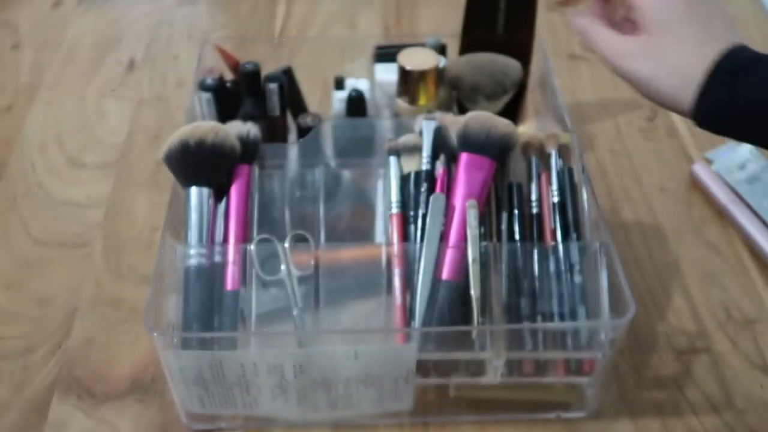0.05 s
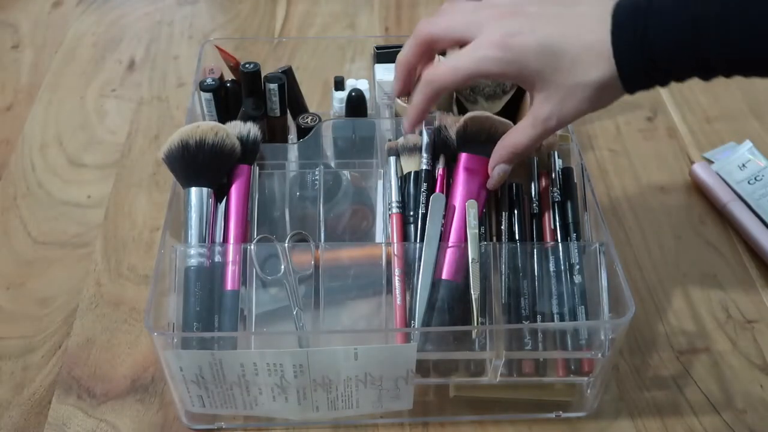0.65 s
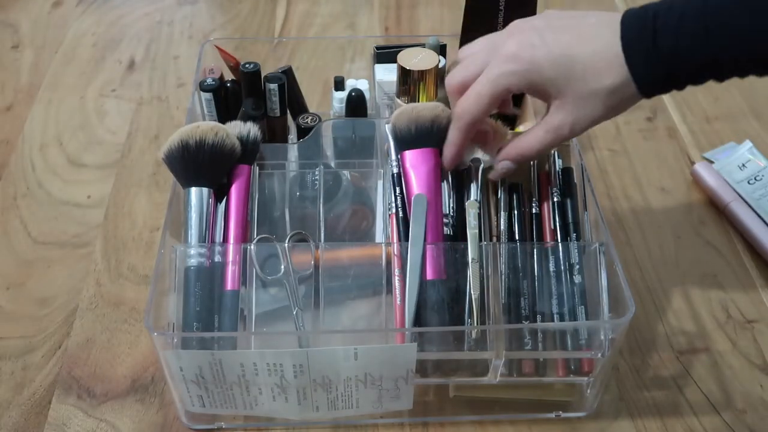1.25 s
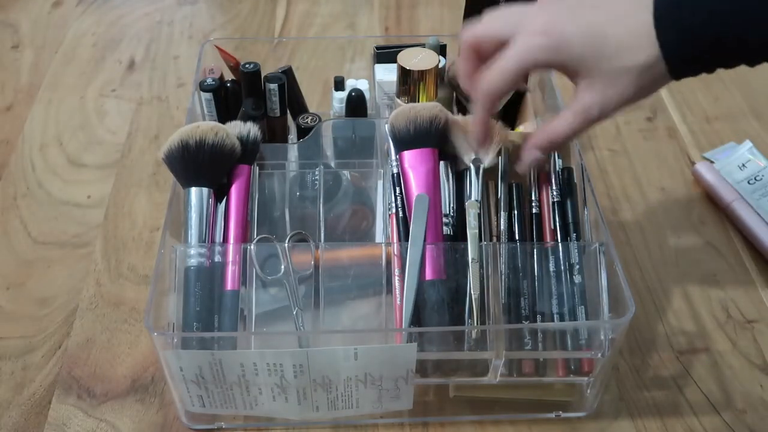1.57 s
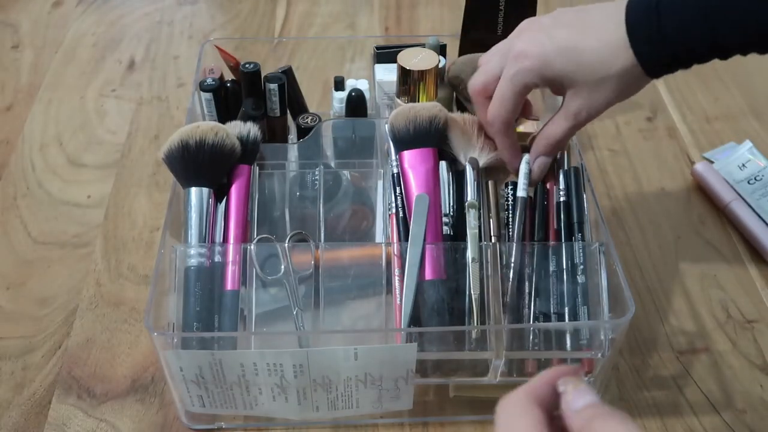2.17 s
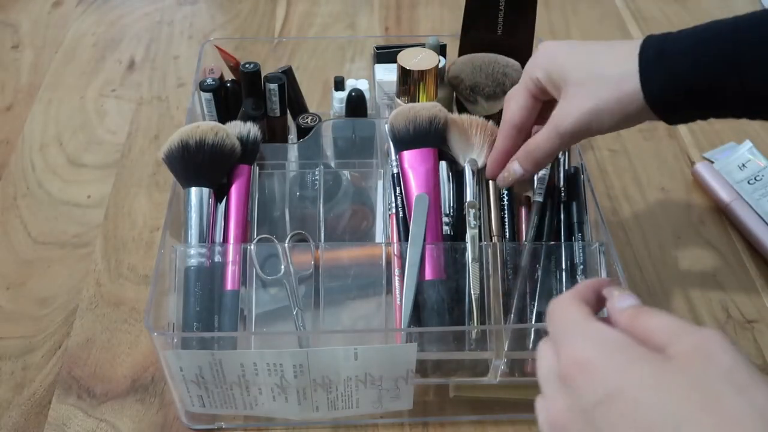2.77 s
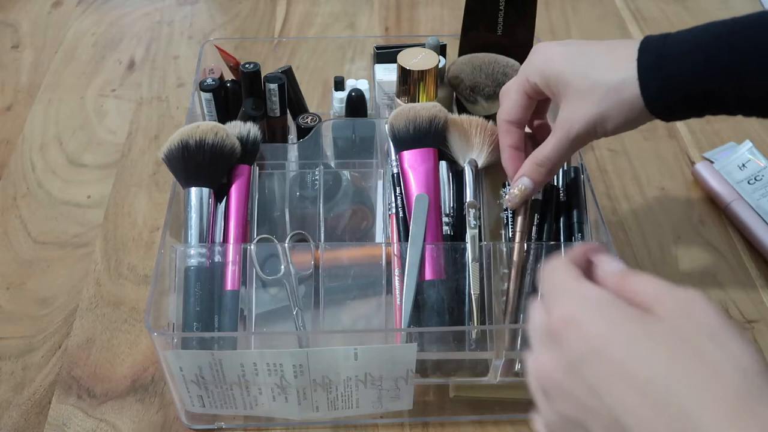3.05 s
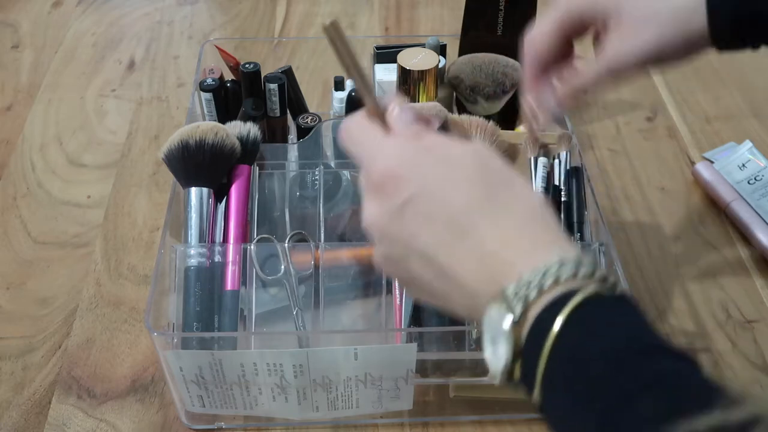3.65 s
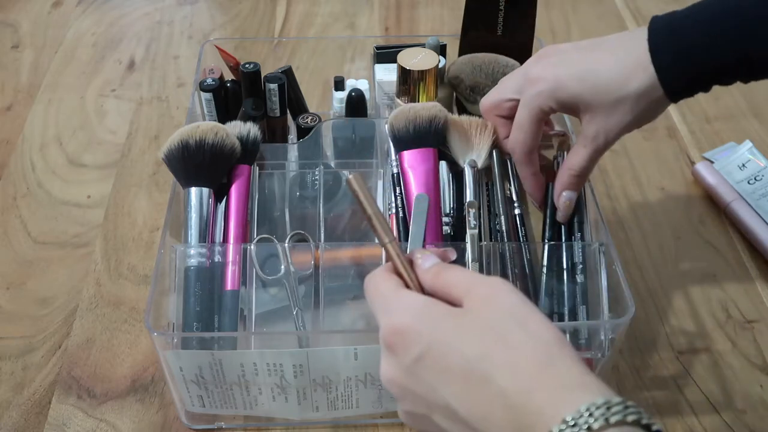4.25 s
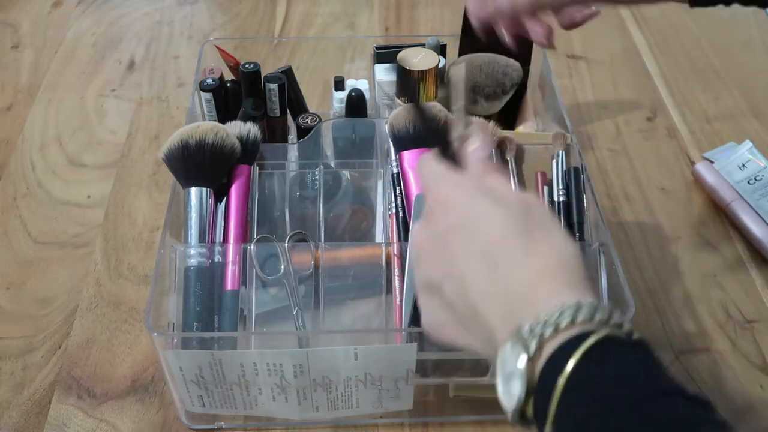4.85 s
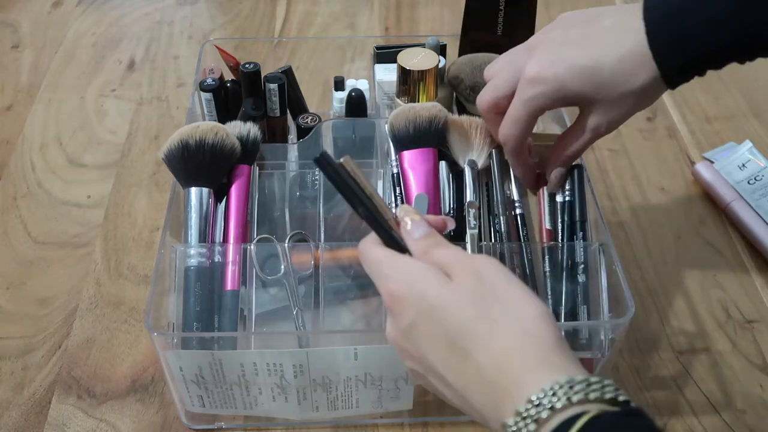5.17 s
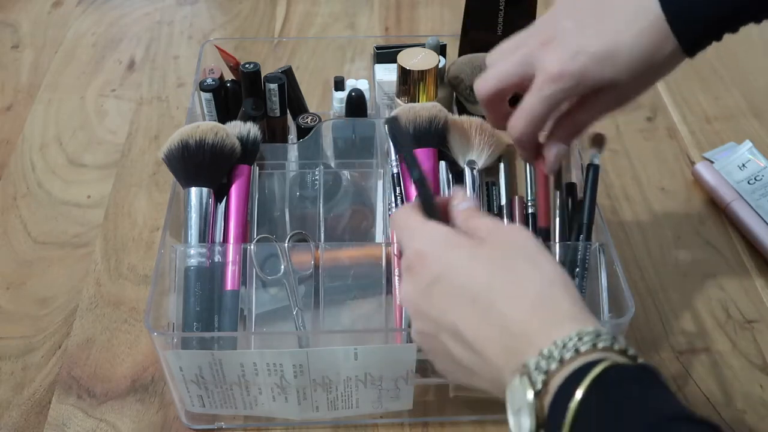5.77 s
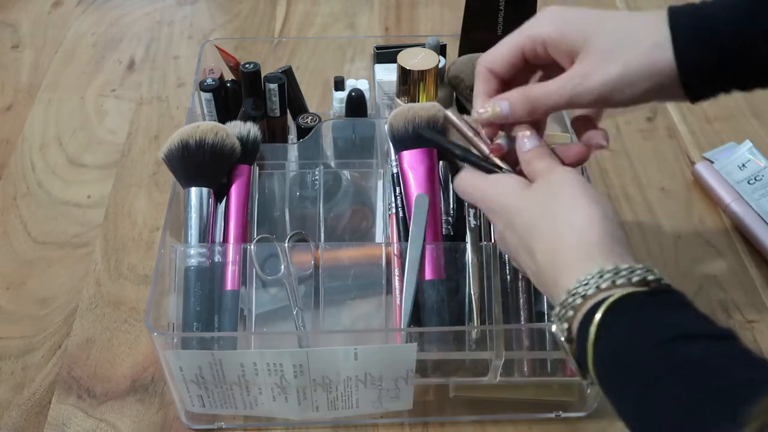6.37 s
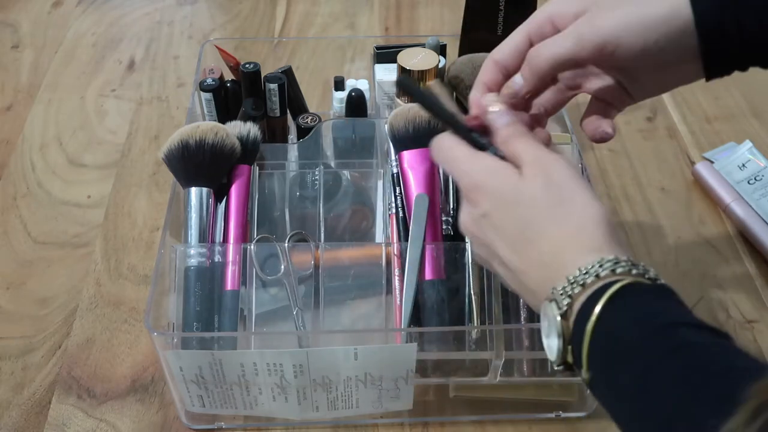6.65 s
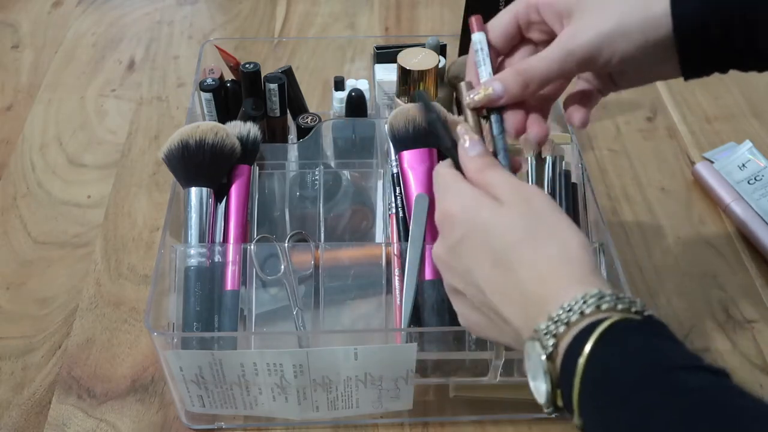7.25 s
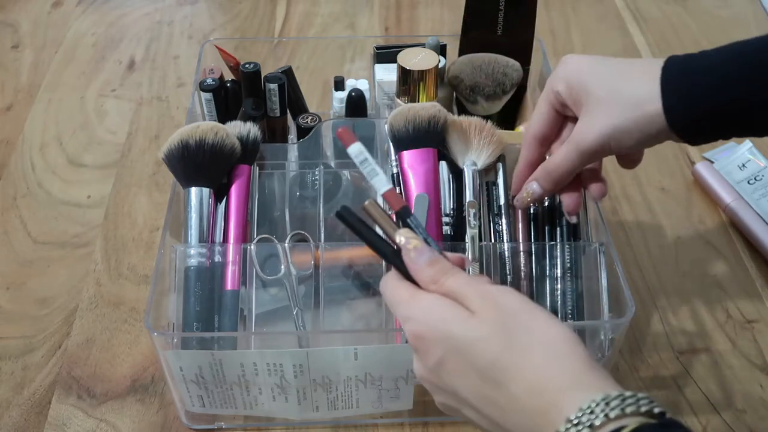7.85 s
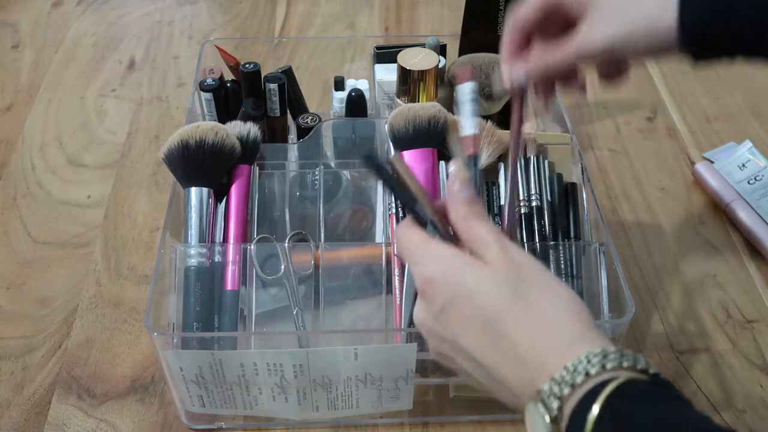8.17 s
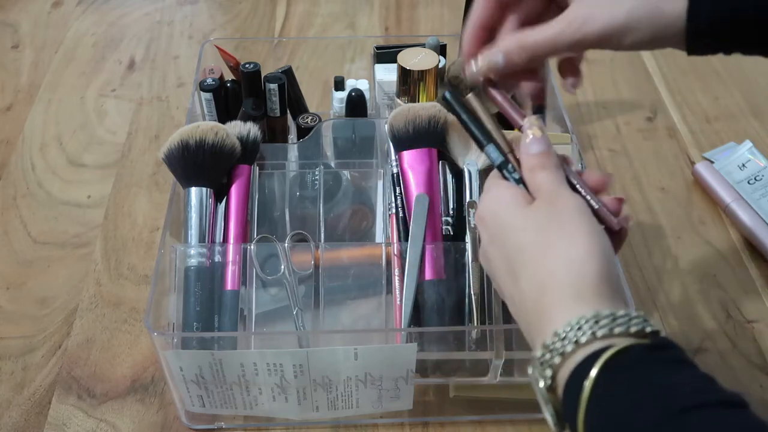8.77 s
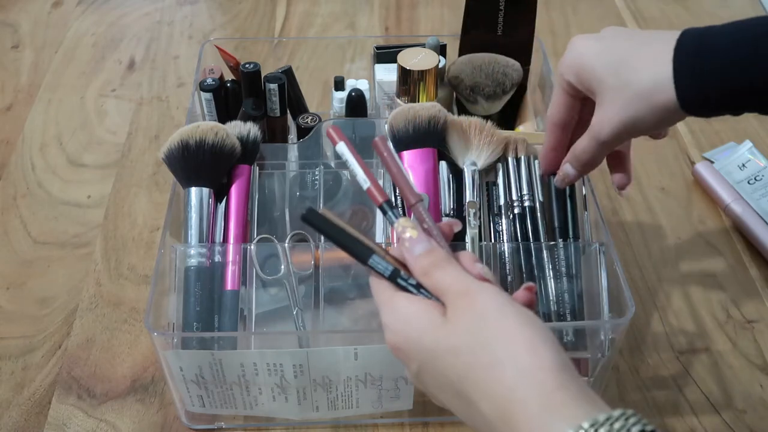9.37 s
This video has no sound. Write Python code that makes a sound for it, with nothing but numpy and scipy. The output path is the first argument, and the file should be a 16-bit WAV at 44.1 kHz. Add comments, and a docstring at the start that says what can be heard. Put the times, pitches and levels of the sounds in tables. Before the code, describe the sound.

Pencils and slim brushes are picked out of a plastic organizer on a wooden table, heard close up in a bare room with a short echo and faint steady hum and hiss. A light scrape at 0.2 seconds leads to a cluster of hard clacks around 1 second, with a soft jolt of the table. From 2 seconds the rummaging thickens: pencils drop onto the hollow tray floor, tap and scrape, each knock at a slightly different pitch. Louder clacks with brief rattles along the walls come near 3.4 and 4.5 seconds, and the busiest clatter runs from about 5.2 to 6 seconds. After that it thins to small bright clicks of pencils meeting in the hand, with a scrape and knocks near 6.8 and more knocks around 7.7 and 8.2. A tap and a soft thud finish it at about 9.3 seconds.

```python
"""Pencils and slim brushes are picked out of a clear plastic organizer on a wooden table, in a bare room.
Over faint hum and hiss, a light scrape leads to hard clacks against the walls and a jolt of the table.
Then the rummaging thickens: pencils drop onto the hollow tray floor, scrape, knock with their own
pitches and rattle along a wall on the way out. After six seconds it thins to bright clicks in the hand
and scattered knocks, ending on a tap and a thud. Two close microphones hear each contact, then the room."""
import sys
import numpy as np
from scipy import signal
from scipy.fft import rfft, irfft, next_fast_len
from scipy.io import wavfile

SR = 44100
rng = np.random.default_rng(int(sys.argv[2]) if len(sys.argv) > 2 else 0)


def digitize_waveform(pressure):
    """Quantize a signal to 16-bit integers and store it at the path in sys.argv[1].

    Rows of a 2-D input are taken as channels; values are limited to [-1, 1].
    """
    field = np.atleast_2d(pressure).T
    bounded = np.clip(field, -1, 1)
    quanta = np.round(bounded * 32767).astype(np.int16)
    wavfile.write(sys.argv[1], SR, quanta)


N = 414981
BLOW_S = .01  # a blow's level is its energy taken as an rms over this time
BLOW_T = np.arange(round(.1 * SR)) / SR  # time axis of one blow, in s

# modes of the tray floor and of its walls: f/Hz, level/dB, t60/s
FLOOR_MODES = [(330, -1, 0.034), (381, 0.5, 0.059), (400, -1.5, 0.13), (440, -2.5, 0.061), (490, -2, 0.045),
               (556, 0, 0.03), (614, -1, 0.035), (660, 1, 0.025), (749, -3.5, 0.048)]
WALL_MODES = [(850, 3.5, 0.023), (877, 0, 0.049), (966, -4, 0.05), (1094, -10, 0.11), (1198, 1, 0.032),
              (1260, -8, 0.014), (1530, -2, 0.013)]
# hard strikes: t/s, then f/Hz and level/dB for each of floor, wall, shaft, clink and tip, then tick/dB
HITS = [(0.855, 517, -37, 910, -41, 1430, -46.0, 3440, -39.0, 5500, -40, -50),
        (0.944, 437, -26, 715, -34.5, 1520.0, -33.5, 3220, -28, 6400, -32, -60),
        (0.969, 406, -28, 706, -26, 1590.0, -40, 2930, -33, 5630.0, -52, -48),
        (0.994, 400, -24, 1450.0, -26, 1660, -19, 3290.0, -20, 5240, -25.0, -30.5),
        (1.076, 623, -25.5, 710, -28, 1770.0, -33.0, 3400, -34, 5010.0, -34, -34.0),
        (1.322, 360.0, -30.5, 710, -34.5, 1660, -39, 3670.0, -48, 4370, -51.5, -68),
        (1.724, 400.0, -36.5, 800, -34.5, 2310, -43, 3140, -34.5, 4280, -31.5, -54),
        (1.743, 362, -32, 715, -26.5, 1640, -33.5, 2600.0, -34, 4300, -36.5, -46),
        (2.382, 390.0, -32, 1140, -41.5, 2100, -34.5, 3400, -30, 4320, -33.0, -40),
        (3.099, 437, -25.5, 1290, -25, 2480, -20.5, 3970.0, -28, 5000, -29, -55),
        (3.336, 495, -24.5, 1140, -21, 1880, -22, 2550, -28, 4260, -28.5, -44),
        (3.362, 440.0, -26.5, 926, -23, 2300, -25.5, 3030.0, -35, 4350, -33, -53),
        (3.893, 450.0, -32.5, 1280, -37.0, 2270.0, -40, 3180, -32.5, 4280, -30.5, -50),
        (4.431, 394, -34, 1010, -36, 1560, -29.5, 2700, -29.0, 4300, -28.5, -36),
        (4.477, 500.0, -23.5, 966, -18, 2160, -21.5, 2630, -26.5, 5120.0, -26, -33),
        (4.512, 465, -32.5, 965, -20, 2150, -26.5, 3280.0, -33, 4500, -36, -44),
        (5.866, 434, -22, 1140, -29.0, 1850.0, -26.5, 4340, -20.5, 6200, -26, -22.5),
        (5.935, 400.0, -28.5, 1040, -28, 2350.0, -28, 3070, -31.5, 4300, -36.5, -57),
        (6.021, 390.0, -39, 915, -30.5, 2430, -25, 2590, -24, 6600, -33, -58),
        (6.032, 383, -43, 890.0, -33.5, 1720, -28, 2800, -29, 6630.0, -54, -57.5),
        (6.044, 427, -37, 1250, -29.5, 2320, -40, 2770, -33, 4250, -33, -54),
        (6.706, 384, -36.5, 1260, -42, 1450.0, -38.5, 3890.0, -36, 6200, -35, -36.5),
        (6.757, 376, -39, 1040, -43, 1710, -43, 2830, -38.5, 4590.0, -43, -52.0),
        (6.801, 400.0, -29.5, 1450.0, -45, 2520.0, -45, 2820.0, -33, 6930.0, -44, -50),
        (6.853, 400.0, -38, 1060, -39, 1970, -44, 3500, -46.5, 4850.0, -42.5, -52),
        (7.135, 385, -64, 1380.0, -54.5, 2680.0, -41.5, 3570.0, -39.5, 5640, -41.5, -41),
        (8.181, 430, -33.5, 1390, -39.5, 2110, -37.5, 3460, -31.5, 6150, -35, -38),
        (8.261, 440, -30.5, 850.0, -28, 2210, -25.0, 3730, -26.5, 4400.0, -25.5, -58)]


def from_db(db):
    """Decibels to gain."""
    return 10 ** (np.asarray(db) / 20)


def at_hz(points, hz):
    """Read a curve on a log-frequency axis."""
    points = np.array(points)
    return np.interp(np.log(np.maximum(hz, 1)), np.log(points[:, 0]), points[:, 1])


def columns(rows):
    """A table's columns, each with one row a blow."""
    return np.transpose(rows)[..., None]


def unit_blow(x):
    """Scale each row to the energy of BLOW_S seconds at rms 1."""
    return x * np.sqrt(BLOW_S * SR / (np.sum(x ** 2, axis=-1, keepdims=True) + 1e-20))


def band(x, low_hz, high_hz, order=2):
    """Causal band-pass."""
    sos = signal.butter(order, [low_hz, high_hz], "band", fs=SR, output="sos")
    return signal.sosfilt(sos, x + 1e-18)


def add(track, s, sound):
    """Mix a sound into the track from time s."""
    start = round(s * SR)
    track[start:start + len(sound)] += sound[:max(N - start, 0)]


def stereo_noise(size, likeness):
    """Frequencies, spectra of two white noises with a given likeness, and the share they have in common."""
    mid, side = rfft(rng.standard_normal((2, size)))
    hz = np.fft.rfftfreq(size, 1 / SR)
    common = (1 + at_hz(likeness, hz)) / 2
    return hz, np.sqrt(common) * mid + np.sqrt(1 - common) * side * [[1], [-1]], common


def background(hiss_db=-55.5):
    """Room tone: rumble that both microphones share, their own hiss, and hum."""
    # colour of rumble and hiss: f/Hz, relative density/dB
    colour = [(15, -36.5), (25, -8), (108, -3), (170, -4), (354, -3.5), (476, -9.5), (775, -12),
              (1130, -14), (1370, -15), (2610, -18), (3250, -20.5), (3920, -21.5), (4740, -24.5),
              (12900, -33), (16000, -72)]
    # their stereo image: f/Hz, left-right likeness
    likeness = [(60, 1), (130, 0.77), (290, 0.21), (640, -0.12), (1410, -0.089), (6800, -0.22),
                (15000, 0.96)]
    # mains hum and a thin whine: f/Hz, level/dB
    tones = [(49, -69), (102, -68), (13050, -74.5)]
    size = 2 * next_fast_len(N // 2 + 1)
    hz, noise, common = stereo_noise(size, likeness)
    hiss = irfft(noise * from_db(at_hz(colour, hz)) / np.sqrt(common), size)[:, :N]
    t = np.arange(N) / SR
    hum = sum(from_db(db) * np.sqrt(2) * np.sin(2 * np.pi * (f * t + rng.random())) for f, db in tones)
    return from_db(hiss_db) * hiss / np.std(hiss.mean(axis=0)) + hum


def room(send, predelay_s=.00607, build_s=.00076, early_db=-2, early_t60=.12):
    """Strong early reflections off table and body, then a diffuse tail that dies sooner in the treble."""
    # reverb time: f/Hz, t60/s
    decay_times = [(100, 0.66), (300, 0.57), (900, 0.55), (2000, 0.58), (5000, 0.53), (13000, 0.32)]
    # reverb against its send: f/Hz, level/dB
    colour = [(100, 1.5), (400, -3.5), (1000, 1.5), (2500, -1.56), (6000, -0.86), (13000, -3)]
    # stereo image of the reverb: f/Hz, left-right likeness
    likeness = [(250, 1), (700, 1), (1400, 1), (3100, 0.99), (6800, 0.55), (15000, 1)]
    hz, noise, _ = stereo_noise(SR, likeness)
    since = np.maximum(np.arange(SR) / SR - predelay_s, 0)
    early = from_db(early_db - 60 * since / early_t60)
    tail = 0
    for centre, t60 in decay_times:
        share = at_hz([(f, f == centre) for f, _ in decay_times], hz)
        wash = irfft(noise * share * from_db(at_hz(colour, hz)), SR)
        decay = np.minimum(since / build_s, 1) * (from_db(-60 * since / t60) + early)
        tail = tail + wash * decay / np.sqrt(np.sum(decay ** 2))
    return signal.fftconvolve(send[None], tail, axes=1)[:, :N]


def place_in_tray(tracks, s, direct, send, pan_spread_db=.2, lag_spread_s=.000012):
    """A contact at a random spot shifts slightly in level and arrival. Tracks: left, right, room send."""
    spot = rng.standard_normal()
    pan = from_db(-pan_spread_db * spot / 2)
    add(tracks[0], s, direct * pan)
    add(tracks[1], s + lag_spread_s * spot, direct / pan)
    add(tracks[2], s, send)


def ring(modes, count=1, pitch=1, favoured_hz=None, focus_db_per_octave=22, spread_db=3, detune=.017):
    """Damped modes, one row a blow; the point of contact gives each a new strength and sign."""
    chance = rng.standard_normal((count, len(modes), 3)).transpose(1, 2, 0)[..., None]
    out = 0
    for (hz, db, t60), (strength, sign, shift) in zip(modes, chance):
        if favoured_hz is not None:
            db = db - focus_db_per_octave * np.abs(np.log2(hz / favoured_hz))
        phase = 2 * np.pi * hz * pitch * (1 + detune * shift) * BLOW_T
        envelope = from_db(db + spread_db * strength - 60 * BLOW_T / t60)
        out = out + np.sign(sign) * envelope * np.sin(phase)
    return unit_blow(out)


def crack(low_hz, high_hz, t60, count=1, rise_s=.00019):
    """The attack: many heavily damped modes speak in the first milliseconds, one row a blow."""
    envelope = from_db(-60 * BLOW_T / t60) * (1 - np.exp(-BLOW_T / rise_s))
    burst = rng.standard_normal((count, len(BLOW_T))) * envelope
    return unit_blow(band(burst, low_hz, high_hz, order=3))


def band_click(low_hz, high_hz, order):
    """A heavily damped resonance answers an impulse."""
    return unit_blow(band(1. * (BLOW_T == 0), low_hz, high_hz, order))


def thuds(count):
    """The table top, shaken through the organizer's feet, one row a blow."""
    # modes of the wooden top: f/Hz, level/dB, t60/s
    table_modes = [(67, 4.5, 0.064), (106.3, -4.5, 0.2), (157.2, -1.5, 0.18), (244, 7, 0.1)]
    return unit_blow(band(ring(table_modes, count), 68, 375))


def jolts():
    """The hand shoves the whole organizer against the table top."""
    # shoves: t/s, level/dB
    shoves = [(1.073, -36.5), (1.323, -43), (1.725, -39), (1.746, -39), (5.531, -36), (5.58, -44),
              (6.377, -41), (7.696, -39.5), (9.307, -37)]
    out = np.zeros(N)
    for (s, db), thud in zip(shoves, thuds(len(shoves))):
        add(out, s, from_db(db) * thud)
    return out


def slides(slips_per_s=220, uneven_db=5):
    """A sliding pencil catches and slips; every slip is a tiny new blow on tray and shaft."""
    # scrapes along the walls: t/s, length/s, tray/dB, shaft/dB
    scrapes = [(0.229, 0.058, -53, -67), (0.998, 0.072, -33, -46), (2.053, 0.089, -41, -48),
               (2.66, 0.38, -58.5, -62), (3.06, 0.05, -47, -54), (3.824, 0.066, -48, -46),
               (3.892, 0.075, -40, -43.5), (4.351, 0.058, -45, -42), (5.199, 0.046, -39.5, -47),
               (5.514, 0.12, -38.5, -46), (5.745, 0.16, -33.5, -51), (5.875, 0.075, -33, -36.5),
               (6.02, 0.037, -46, -39.5), (6.711, .17, -41.5, -48), (9.299, 0.096, -48.5, -70)]
    out = np.zeros(N)
    for s, length, tray_db, shaft_db in scrapes:
        count = max(round(slips_per_s * length), 3)
        tray = band(ring(FLOOR_MODES, count) + from_db(-12) * ring(WALL_MODES, count), 283, 1900)
        shaft = crack(1100, 3330, .019, count) + from_db(-8) * crack(3800, 9400, .0023, count)
        slips = from_db(tray_db) * tray + from_db(shaft_db) * shaft
        # the slips share the slide's power unevenly
        sizes = from_db(uneven_db * rng.standard_normal(count))
        sizes /= np.sqrt(np.mean(sizes ** 2) * BLOW_S * slips_per_s)
        times = s + length * (np.arange(count) + rng.random(count)) / count
        for start, size, slip in zip(times, sizes, slips):
            add(out, start, size * slip)
    return out


def part(ringing, low_hz, high_hz, crack_t60, ring_db):
    """One radiating part: its ring and its crack, within the band where it radiates well."""
    both = from_db(ring_db) * ringing + crack(low_hz, high_hz, crack_t60, count=len(ringing))
    return unit_blow(band(both, .64 * low_hz, 1.45 * high_hz))


def parts(hardness, knock_hz=495, shaft_hz=2400, clink_hz=3970):
    """Table top, floor, wall, shaft, clink and tick; a soft contact dwells longer and smears the crack."""
    # a pencil's bending modes and its clink: multiple of the pitch, level/dB, t60/s
    shaft_modes = [(.78, -13, 0.0094), (1, -10, 0.021), (1.2, -11.5, 0.02)]
    clink_modes = [(.86, -4, 0.0062), (1, 10, 0.0085), (1.25, -10, 0.005)]
    count = len(hardness)
    dwell = 1 + .22 * np.clip(2 - hardness, 0, 12)
    floor = part(ring(FLOOR_MODES, count, favoured_hz=knock_hz), 301, 718, .013 * dwell, ring_db=8)
    wall = part(ring(WALL_MODES, count), 815, 1490, .01 * dwell, ring_db=1)
    shaft = part(ring(shaft_modes, count, pitch=shaft_hz), 1340, 3200, .012 * dwell, ring_db=2)
    clink = part(ring(clink_modes, count, pitch=clink_hz), 2750, 6600, .021 * dwell, ring_db=-1)
    tick = unit_blow(crack(5600, 8700, .01 * dwell, count) + crack(9100, 13800, .017 * dwell, count))
    return np.array([thuds(count), floor, wall, shaft, clink, tick])


def all_round(blows, low_hz, high_hz, colour_db):
    """Summed over all directions, a part's peaks and dips even out towards a plain click in its band."""
    click = band_click(low_hz, high_hz, order=3) * rng.choice([-1, 1], (len(blows), 1))
    return unit_blow(click + from_db(colour_db) * blows)


def strike(mix, s, db, hardness, **pitches):
    """Blows shake all six parts. Hardness tilts them: below 0 a soft nudge, above 0 a bright, sharp hit."""
    # place of table top, floor, wall, shaft, clink and tick on the tilt: distance from the shaft/octaves
    part_octaves = np.array([-2, -2, -1, 0, 1, 2])
    levels = np.reshape(mix, (6, 1, 1)) + db + hardness * part_octaves[:, None, None]
    # the further the clink stands above the floor's knock, the harder the surfaces that met
    surface_hardness = (levels[4] - levels[1]) / np.ptp(part_octaves[1:5])
    sounds = parts(surface_hardness, **pitches)
    thud, floor, wall, shaft, clink, tick = sounds
    around = [thud, floor,
              all_round(wall, 720, 1210, colour_db=-1), all_round(shaft, 1180, 2630, colour_db=3),
              all_round(clink, 3020, 4750, colour_db=3.5), all_round(tick, 6800, 11000, colour_db=-9)]
    directs = np.sum(from_db(levels) * sounds, axis=0)
    sends = np.sum(from_db(levels) * around, axis=0)
    tracks = np.zeros((3, N))
    for start, direct, send in zip(s[:, 0], directs, sends):
        place_in_tray(tracks, start, direct, send)
    return tracks


def strike_and_rebound(mix, s, db, hardness, rebound_db, gap_s=.011, softer=.45, **pitches):
    """A loose pencil strikes, then touches once more, quieter and duller."""
    again = s + gap_s * rng.uniform(.7, 1.3, s.shape)
    first = strike(mix, s, db, hardness, **pitches)
    return first + strike(mix, again, db + rebound_db, hardness - softer, **pitches)


def clicks():
    """Pencils gripped in the hand meet clear of the tray: thin, bright clicks."""
    # clicks: t/s, level/dB, hardness/(dB per octave), clink/Hz
    cues = [(1.441, -41, -7.5, 4500), (4.772, -48, -5, 3280), (4.988, -47, -5.5, 4000),
            (5.383, -43.5, -10.5, 3400), (8.862, -54, 1, 3400), (6.094, -46.5, 5.5, 4730),
            (6.194, -44, 2, 4370), (6.3, -58, 3.5, 6000), (7.062, -45, 1, 4870), (7.31, -47.5, 3.5, 5500),
            (7.373, -51.5, -1.5, 5900), (7.447, -48, -2, 4080), (8.463, -43, -1.5, 5700),
            (8.497, -44.5, 0.5, 6200), (8.876, -52, -1, 5800), (8.954, -46, 1, 4100)]
    # balance of table top, floor, wall, shaft, clink and tick: level/dB
    mix = (-36, -31, -33, -9.5, -0.5, -4.5)
    s, db, hardness, clink_hz = columns(cues)
    return strike(mix, s, db, hardness, clink_hz=clink_hz)


def drops():
    """A pencil lands on its hard end: a sharp tick on top of the floor's knock."""
    # landings: t/s, level/dB, hardness/(dB per octave), floor knock/Hz, clink/Hz
    cues = [(1.71, -40, -0.5, 680, 4600), (2.059, -35.5, -1, 460, 4050), (2.071, -32, 1.5, 550, 4000),
            (2.081, -30.5, -0.5, 490, 3950), (2.137, -37.5, 1.5, 500, 4600), (2.286, -40.5, -1, 467, 3400),
            (2.301, -39, -2, 740, 5640), (2.508, -41, -1, 400, 3860), (4.34, -38.5, -0.5, 547, 6200),
            (5.139, -51.5, 7.5, 410, 5640), (5.197, -33.5, -0.5, 390, 4250), (5.531, -29.5, -1, 405, 4250),
            (5.577, -34, -2, 420, 4840), (5.59, -32, -0.5, 550, 3370), (5.812, -37, 2, 490, 3800),
            (5.842, -29, -1.5, 570, 3670), (6.376, -36, 0.5, 400, 3560), (6.824, -36.5, -1, 418, 4600),
            (8.127, -39, 2, 400, 6750)]
    # balance of table top, floor, wall, shaft, clink and tick: level/dB
    mix = (-15.5, -2, -7, -6.5, -5.5, -11.5)
    s, db, hardness, knock_hz, clink_hz = columns(cues)
    return strike_and_rebound(mix, s, db, hardness, rebound_db=-11, knock_hz=knock_hz, clink_hz=clink_hz)


def taps():
    """A pencil is nudged against the tray: mostly the hollow note of the floor."""
    # nudges: t/s, level/dB, hardness/(dB per octave), floor knock/Hz, shaft/Hz
    cues = [(0.752, -46.5, -4, 680, 2330), (1.365, -39.5, -1, 640, 1690), (2.324, -28, 3, 394, 2300),
            (2.758, -37.5, 0.5, 477, 1730), (2.826, -37.5, 3, 460, 2310), (3.213, -29.5, 2.5, 440, 2270),
            (3.932, -30.5, 3, 553, 3100), (4.363, -26, 2.5, 470, 2280), (5.469, -35, 1.5, 580, 2340),
            (6.496, -36.5, 3, 480, 3100), (7.797, -31.5, 2.5, 440, 2980), (2.374, -29, 2, 430, 2950),
            (2.662, -37.5, -2.5, 423, 2400), (2.685, -47, -4.5, 515, 2400), (2.852, -43, -3.5, 500, 2030),
            (2.878, -47, 0.5, 550, 2030), (2.912, -50.5, -1, 384, 2030), (3.09, -40, -0.5, 680, 2280),
            (2.944, -36, 0, 400, 2460), (3.05, -37, 1, 540, 2290), (3.825, -32, 1.5, 400, 2820),
            (3.836, -23, 0.5, 426, 2120), (4.008, -41, -1.5, 400, 2540), (4.108, -38, -1, 440, 2470),
            (4.272, -38, -1.5, 484, 2150), (4.399, -41, -7, 440, 2320), (5.151, -35.5, -2, 400, 3000),
            (5.207, -26.5, 2.5, 398, 2640), (5.636, -31, -1.5, 563, 2110), (5.744, -28, -1, 583, 3170),
            (5.773, -32, -1.5, 530, 2830), (5.835, -23.5, 0, 555, 3300), (6.43, -45, -3.5, 400, 2480),
            (7.691, -26, 1.5, 433, 3230), (7.774, -41, -4.5, 404, 2080), (7.989, -34, 0, 430, 1910),
            (9.17, -37.5, -1, 430, 2990), (9.306, -34, -0.5, 430, 2740)]
    # balance of table top, floor, wall, shaft, clink and tick: level/dB
    mix = (-18.5, -1, -13, -12, -16, -27.5)
    s, db, hardness, knock_hz, shaft_hz = columns(cues)
    return strike_and_rebound(mix, s, db, hardness, rebound_db=-10.5, knock_hz=knock_hz, shaft_hz=shaft_hz)


def through_tray(sound, contact_hz=12500, bounce_share=.62, buzz_db=-8, buzz_t60=.03):
    """Contact time dulls the blow, bounces in the thin plastic thicken it, and loose pencils buzz."""
    sound = signal.sosfilt(signal.butter(2, contact_hz, fs=SR, output="sos"), sound)
    round_trips_s = np.array([.00019, .00037, .00071]) * rng.uniform(.75, 1.25, 3)
    for lag in (round_trips_s * SR).astype(int):
        feedback = np.r_[1, np.zeros(lag - 1), bounce_share]
        sound = signal.lfilter(feedback[::-1], feedback, sound)  # all-pass
    chatter = rng.standard_normal(len(BLOW_T)) * from_db(-60 * BLOW_T / buzz_t60)
    buzz = signal.fftconvolve(sound, chatter / np.linalg.norm(chatter))[:len(BLOW_T)]
    return sound + from_db(buzz_db) * buzz


def hard_blows(rows, floor_ring_db=-13, wall_ring_db=-8, thud_db=-24):
    """Each blow wakes five damped resonances and a tick; floor, walls and table top ring on faintly."""
    # floor, wall, shaft, clink and tip resonances: width/octaves
    widths = (.42, 0.32, .16, .17, .16)
    edge = 2 ** (np.array(widths) / 2)
    tracks = np.zeros((3, N))
    for s, *resonances, tick_db in rows:
        hz, gain = np.array(resonances[::2]), from_db(resonances[1::2])
        low_hz, high_hz = hz / edge, hz * edge
        clack = sum((-1) ** k * gain[k] * band_click(low_hz[k], high_hz[k], order=1) for k in range(5))
        tick = from_db(tick_db) * crack(6450, 12700, t60=.0064)[0]
        attack = through_tray(clack + tick)
        floor = from_db(floor_ring_db) * ring(FLOOR_MODES, favoured_hz=hz[0])[0]
        thud = from_db(thud_db) * thuds(1)[0]
        wall = from_db(wall_ring_db) * ring(WALL_MODES)[0]
        sound = attack + gain[0] * (floor + thud) + gain[1] * wall
        place_in_tray(tracks, s, sound, sound)
    return tracks


def rattles(blows_per_s=59, spread_db=1, spread_octaves=.15):
    """The pencil that struck last knocks along a wall on its way out, each blow a little different."""
    # quick, uneven runs: t/s, length/s, level against the hit before/dB
    runs = [(3.376, .06, -15.5), (4.523, .045, -7), (5.953, .065, -6.5)]
    blows = []
    for start, length, db in runs:
        last_hit = np.array([row for row in HITS if row[0] < start][-1])
        count = max(round(blows_per_s * length), 2)
        for s in start + length * (np.arange(count) + rng.random(count)) / count:
            blow = last_hit.copy()
            blow[0] = s
            blow[1:-1:2] *= 2 ** (spread_octaves * rng.standard_normal(5))  # pitches
            blow[2:-1:2] += db + spread_db * rng.standard_normal(5)  # their levels
            blow[-1] += db  # tick
            blows.append(blow)
    return hard_blows(blows)


def hits():
    """Pencils strike the walls and each other hard; handle and point of contact set what resonates."""
    return hard_blows(HITS)


def scene():
    """All handling sounds in the room; the organizer stands a little to the right."""
    tracks = hits() + rattles() + taps() + drops() + clicks() + slides() + jolts()
    direct, send = tracks[:2], tracks[2]
    return (direct + room(send)) * from_db([[-.33], [.33]]) + background()


def record(dry, cutoff_hz=16150):
    """The left microphone port lags in the treble; the top is cut steeply."""
    # phase turn of the ports: f/Hz, lag of the left/rad
    port_lag = [(200, 0), (500, .15), (1500, .2), (3000, .35), (5300, 1.1), (6900, .9), (8400, 1.7),
                (11000, 1.5), (15000, 3.0)]
    size = 2 * next_fast_len(N // 2 + 1000)
    lag = at_hz(port_lag, np.fft.rfftfreq(size, 1 / SR))
    left = irfft(rfft(dry[0], size) * np.exp(-1j * lag), size)[:N]
    return signal.sosfilt(signal.ellip(10, .2, 80, cutoff_hz, fs=SR, output="sos"), [left, dry[1]])


dry = scene()
out = record(dry)
digitize_waveform(out)
```